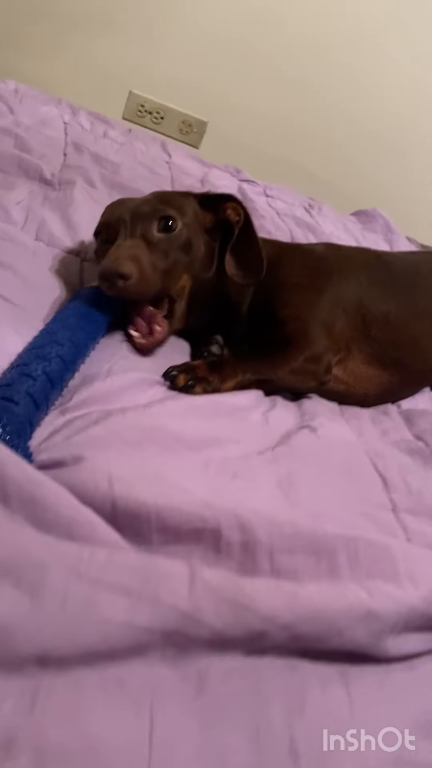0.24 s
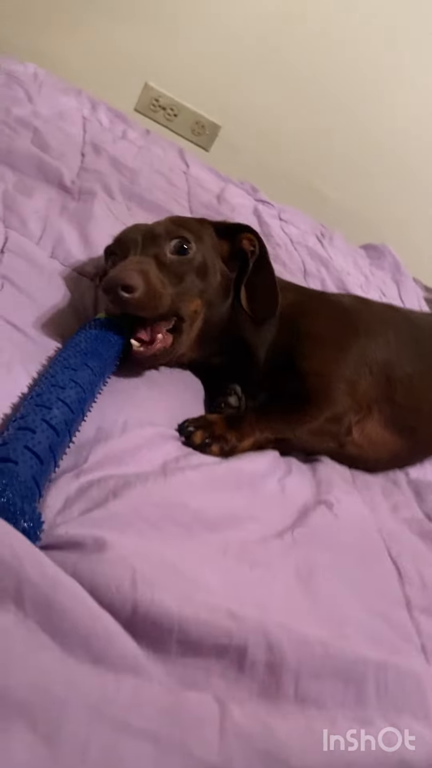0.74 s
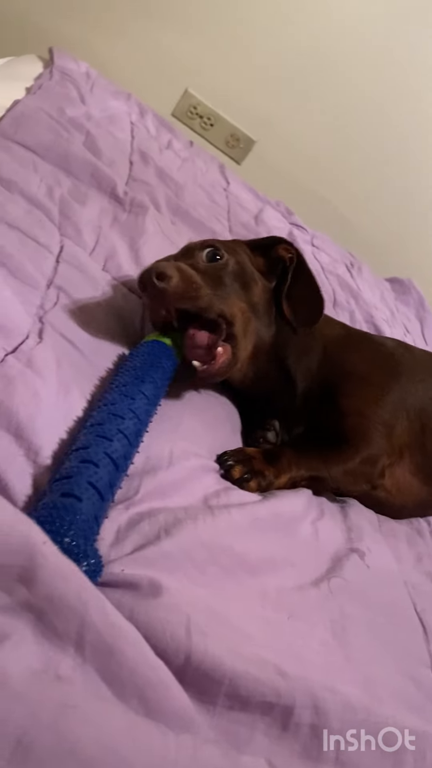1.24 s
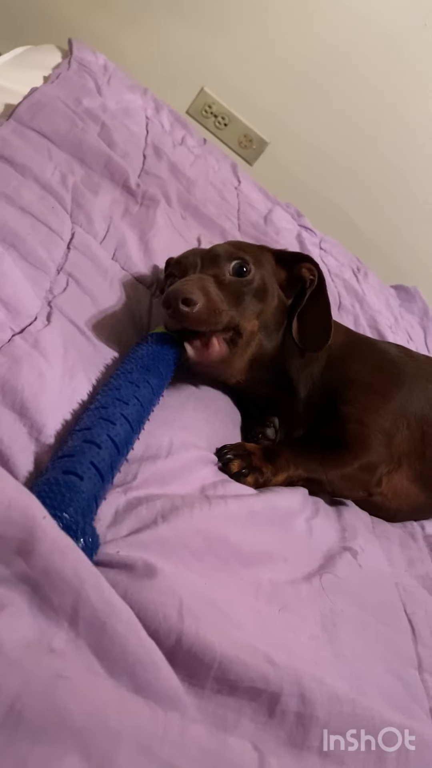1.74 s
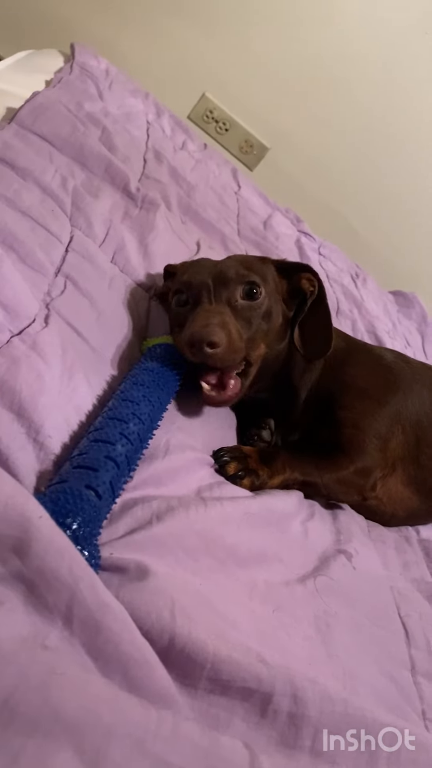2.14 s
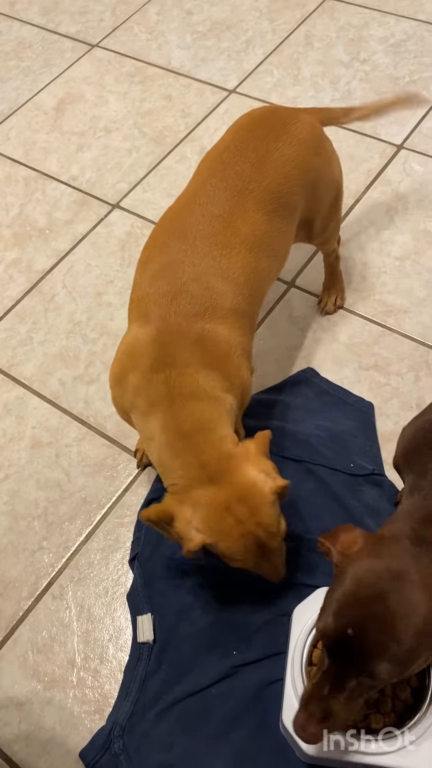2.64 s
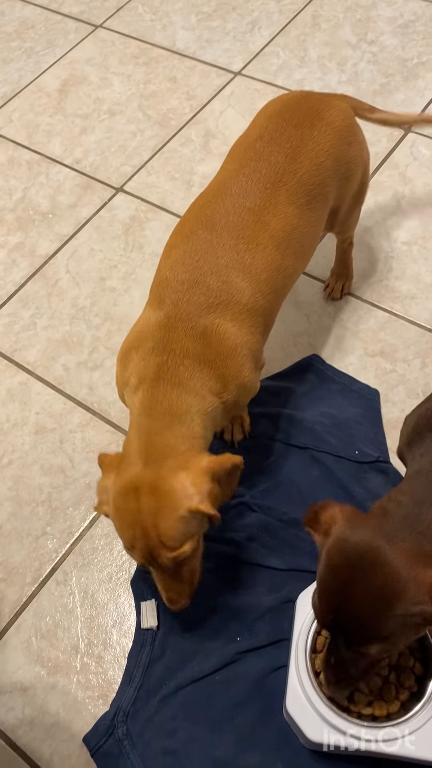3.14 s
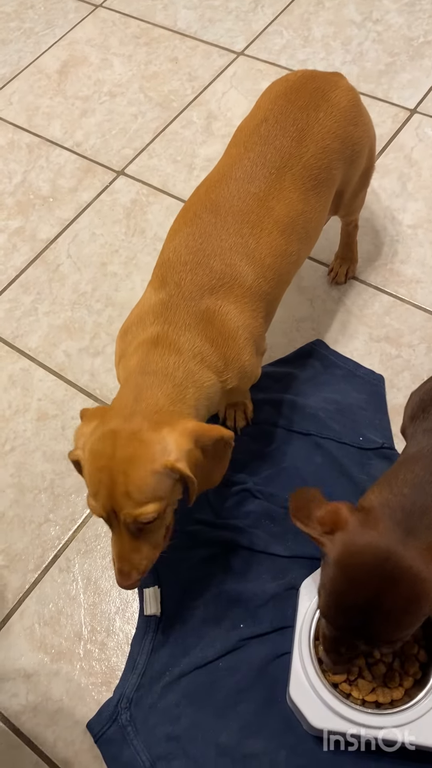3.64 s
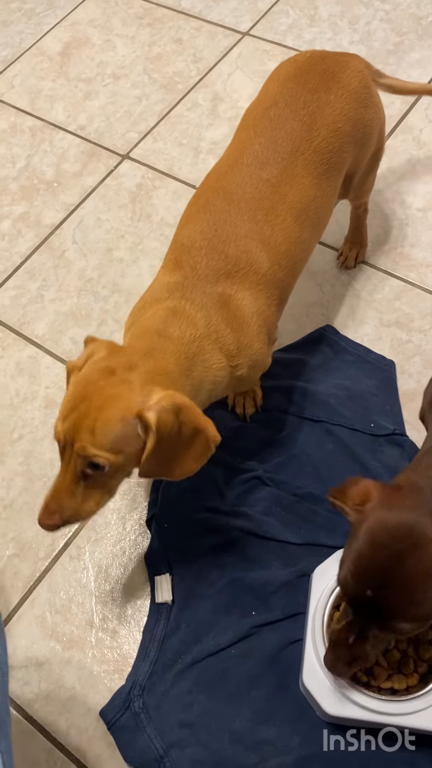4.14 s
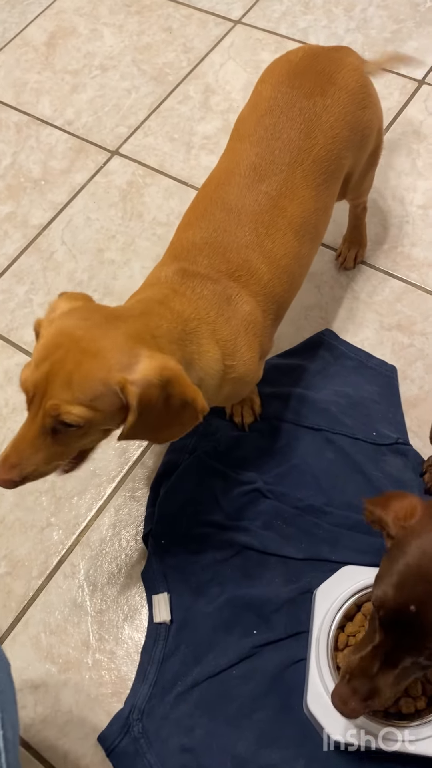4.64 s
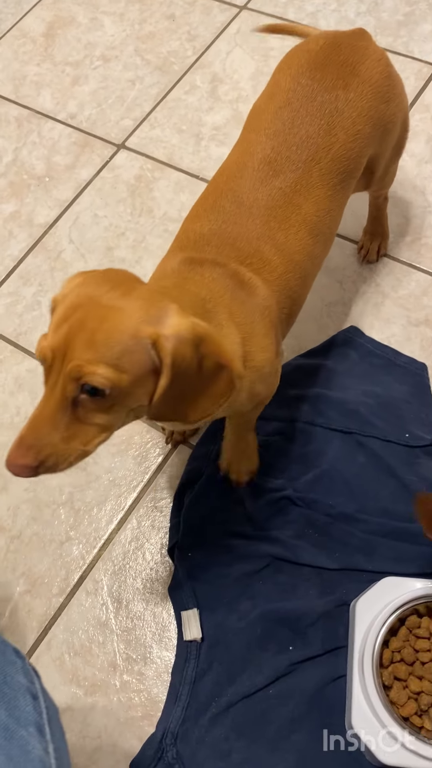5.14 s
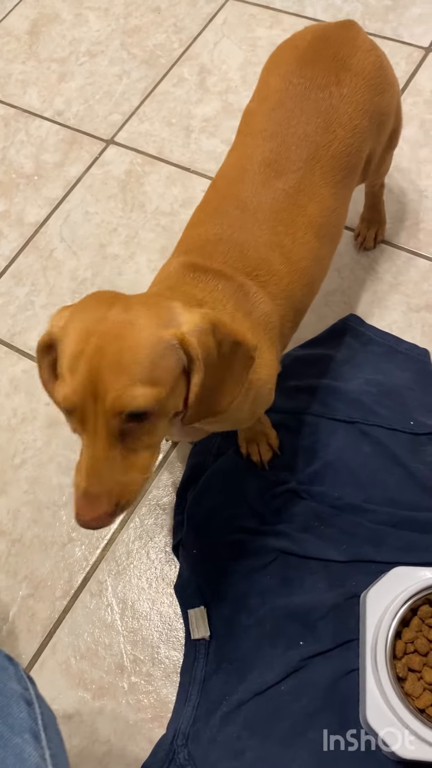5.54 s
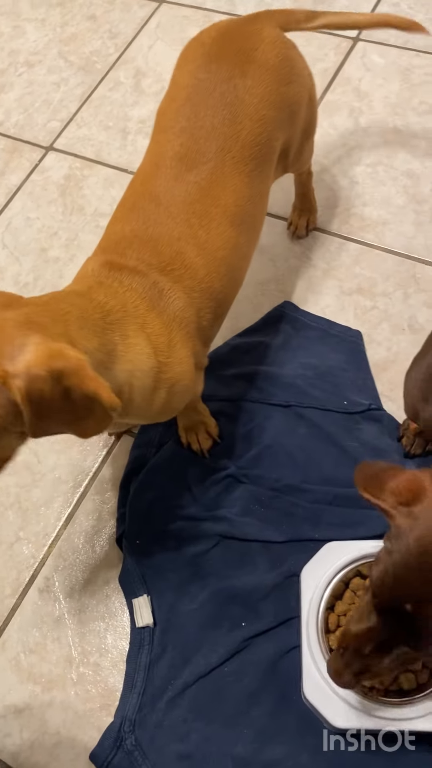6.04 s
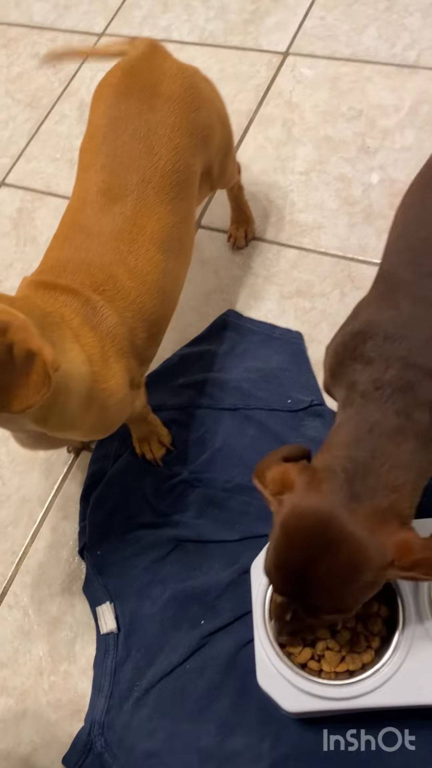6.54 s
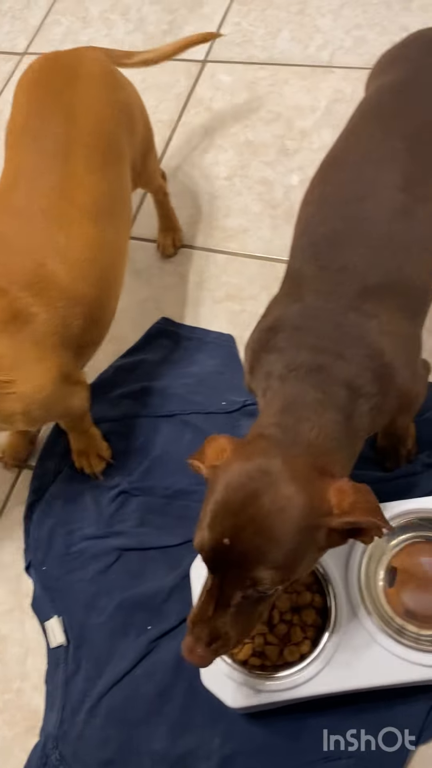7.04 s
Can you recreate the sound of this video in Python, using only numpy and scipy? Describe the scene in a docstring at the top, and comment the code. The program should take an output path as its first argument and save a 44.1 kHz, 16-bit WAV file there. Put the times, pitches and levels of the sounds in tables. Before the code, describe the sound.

Faint wet mouth clicks and one jaw clap, followed by dogs crunching kibble, with pellets rattling in metal bowls and hollow knocks.

```python
"""In a quiet bedroom a small dog smacks its lips and claps its jaws once: the click excites the resonances
of its mouth, and the mattress bounces. At 2.3 s the scene changes to a tiled kitchen, where two dogs nose
through dry pellets in steel bowls. Each bite is a brittle fracture that rings the steel; pellets collide,
and the hollow stand, pushed about, knocks and drums by stick-slip friction, loudest near 5 s. Both rooms
reverberate and rumble faintly. A phone with two microphone ports listens from above."""
import sys
import numpy as np
from scipy import signal
from scipy.fft import rfft, irfft, next_fast_len
from scipy.io import wavfile
from scipy.ndimage import uniform_filter1d

SR = 44100
rng = np.random.default_rng(int(sys.argv[2]) if len(sys.argv) > 2 else 0)


def wav_out(sig):
    """Save sig, one row per channel (or a flat mono array), as 16-bit PCM at SR to the path in sys.argv[1]."""
    wavfile.write(sys.argv[1], SR, np.round(np.clip(np.atleast_2d(sig).T, -1, 1) * 32767).astype(np.int16))


N = 321489
T = np.arange(N) / SR
KITCHEN = np.clip((T - 2.325) / 0.024, 0, 1)  # crossfade: 0 in the bedroom, 1 in the kitchen
HEAP_DB = -38.5  # reference level: a whole heap pushed aside

# muzzles stirring the bowls: (time [s], pellet rattle level [dB], stand drumming level [dB])
STIRRING = [(2.33, -56, -46), (2.44, -65, -70), (2.49, -56, -52.5), (2.62, -63, -64), (2.81, -49.5, -45),
            (2.92, -63, -62.5), (2.96, -53, -61.5), (3.05, -55.5, -53), (3.13, -60.5, -57),
            (3.3, -59.5, -60.5), (3.565, -66, -62.5), (3.66, -51.5, -47), (3.83, -47, -51),
            (3.93, -54, -55), (4.0, -47.5, -44.5), (4.19, -41, -43), (4.29, -36.5, -38.5),
            (4.37, -41, -40.5), (4.62, -41.5, -37), (4.79, -35, -32), (4.95, -39.5, -41),
            (5.3, -46.5, -41.5), (5.56, -36, -31.5), (5.9, -46.5, -40), (6.15, -49.5, -51),
            (6.25, -42, -45), (6.48, -51, -49), (6.56, -49, -50), (6.67, -54, -61), (6.92, -69.5, -61),
            (7.29, -51, -61)]
# modes of a steel bowl: (frequency [Hz], bandwidth [Hz], gain [dB])
BOWL_MODES = [(880, 210, -15.5), (1210, 100, -18.5), (1350, 68, -21), (3000, 90, -5.5), (3170, 450, -3),
              (5180, 1230, -5.5)]


def pellet_bites():
    """Brittle fracture: a pellet gives way between the teeth and excites the bowl's modes."""
    # pellets cracked or knocked: (time [s], level [dB], pitch [Hz], treble gain [dB])
    bites = [(2.35, -34, 1205, 6), (2.381, -29.5, 790, -7), (2.483, -33.5, 870, 10),
             (2.519, -32.5, 1195, 6.5), (2.685, -27.5, 804, -2), (2.696, -33.5, 850, 12),
             (2.749, -32.5, 810, -4), (2.784, -23.5, 1178, -4), (2.824, -29.5, 840, 7.5),
             (2.884, -40, 760, -5), (2.945, -27.5, 1280, -3), (2.961, -34.5, 2100, -4),
             (2.997, -38, 2020, -18), (3.012, -30, 1510, -2.5), (3.067, -34, 1100, -3),
             (3.103, -28.5, 737, -26), (3.179, -15.5, 1620, -27), (3.322, -35, 1780, -15),
             (3.343, -32.5, 1690, -17), (3.369, -40, 1560, -16), (3.397, -32.5, 1640, -20),
             (3.447, -32, 1540, 1), (3.483, -32.5, 1460, 3.5), (3.496, -33, 1420, -20),
             (3.586, -29.5, 1140, -38), (3.635, -24.5, 880, -11), (3.671, -29, 1260, 1),
             (3.693, -28.5, 1850, 2), (3.759, -27, 1480, 1.5), (3.85, -18.5, 1036, 9),
             (3.981, -19, 1960, -2.5), (4.019, -21.5, 785, 9), (4.088, -30, 1520, -10),
             (4.108, -15, 1550, -25), (4.146, -21, 930, -14), (4.27, -20.5, 750, -9),
             (4.296, -16, 1157, -18), (4.304, -18.5, 1160, -20), (4.352, -24, 1600, -4),
             (4.379, -36, 1090, -15), (4.415, -26.5, 1110, 7.5), (4.432, -22, 1150, -25),
             (4.47, -28.5, 860, 8.5), (4.521, -20.5, 1020, -3), (4.549, -23.5, 754, 7), (4.65, -19, 900, 7),
             (4.695, -22.5, 1360, 10.5), (4.74, -19.5, 930, -15), (4.771, -15, 1330, 3),
             (4.781, -17.5, 1420, 6), (4.815, -12.5, 1300, -2.5), (4.836, -5.5, 2850, -4.5),
             (4.888, -21.5, 1400, -13), (4.925, -33, 1120, -10), (4.968, -25.5, 890, -1),
             (4.996, -20.5, 750, -20), (5.017, -25.5, 1510, 2.5), (5.054, -21.5, 1560, -15),
             (5.077, -23, 850, -19), (5.103, -22.5, 1570, -26), (5.182, -28, 855, -18),
             (5.250, -23.5, 1066, -3), (5.333, -27, 875, -19), (5.359, -25, 910, 0.5),
             (5.413, -20.5, 1040, -3), (5.439, -27, 1120, 8), (5.532, -17, 926, -12),
             (5.645, -14, 2295, -6), (5.748, -28.5, 980, -22), (5.811, -28.5, 870, -1),
             (5.84, -24, 850, -0.5), (5.925, -28.5, 738, 8), (5.936, -20, 1760, 3), (5.978, -19.5, 760, -6),
             (6.037, -21, 1454, -4), (6.081, -32.5, 780, 7), (6.204, -40, 751, 17),
             (6.231, -31.5, 1070, 14), (6.278, -32.5, 690, 13), (6.309, -30.5, 1070, 10.5),
             (6.369, -22, 2020, -8), (6.495, -20, 1360, 1), (6.541, -24.5, 1226, 5), (6.686, -30, 1800, 3),
             (6.698, -24.5, 1880, -21), (6.704, -29, 1450, 7.5), (6.714, -31, 1950, -16),
             (6.774, -33.5, 834, -22), (6.864, -31.5, 710, -9), (7.036, -31, 1376, 7.5),
             (7.063, -31.5, 1360, -23), (7.074, -30, 1890, -23), (7.116, -32, 990, -20),
             (7.136, -23, 1950, -30), (7.146, -29, 2800, -22), (7.165, -15, 2850, -1)]
    return transients(bites, t60=0.018, rise_s=0.0012, softer_per_db=0.4553,
                      rough=0.91, crumbs_db=-31, wide_db=-8, steel_db=10.5)


def lip_smacks():
    """Impulsive excitation: the lips give short, bright clicks with a steep onset."""
    # (time [s], level [dB], pitch [Hz], treble gain [dB])
    smacks = [(0.423, -37, 3220, -8), (0.799, -43.5, 1320, 12.5), (.973, -37, 5550, -12),
              (1.272, -44.5, 1575, -22), (1.495, -47, 5100, -4), (1.535, -50, 4900, -9),
              (1.552, -51, 4800, -10), (2.021, -41.5, 1670, -16), (2.148, -46.5, 5270, -4)]
    return transients(smacks, t60=0.012, rise_s=0.0002, softer_per_db=0.5,
                      rough=0.33, crumbs_db=-29.5, wide_db=1, steel_db=-25.5)


def transients(events, t60, rise_s, softer_per_db, rough, crumbs_db, wide_db, steel_db):
    """Damped oscillation: a tone roughened by splinters, a broadband snap that rings steel, then crumbs."""
    out, t = np.zeros(N), np.arange(4000) / SR
    sag = 0.36 * (0.003 * (1 - np.exp(-t / 0.003)) - t / 2)  # pitch falls from 18 % sharp to 18 % flat
    for (s, db, hz, treble_db), noise in zip(events, rng.standard_normal((len(events), 3, 4000))):
        rise = rise_s * amp(softer_per_db * (-13 - db))  # slower below a hard bite of -13 dB
        envelope = (1 - np.exp(-(t / rise) ** 2)) * amp(-60 * t / t60)
        tone = envelope * np.sin(2 * np.pi * hz * (t + sag))
        flicker_db = 4.24 * unit_rms(uniform_filter1d(noise[2], 120))
        crumbs = amp(crumbs_db - 60 * t / (14 * t60) + flicker_db) * np.minimum(t / 0.0037, 1)
        splinters = resonate(noise[0], [(hz, 0.38 * hz, 0), (1.42 * hz, 0.5 * hz, -5)])
        splinters = (rough * envelope + crumbs) * unit_rms(highpass(splinters, 0.33 * hz))
        # heap and muzzle detune the bowl from bite to bite
        bowl = np.multiply(BOWL_MODES, [[1 + 0.07 * np.tanh(v), 1, 1] for v in noise[2, :len(BOWL_MODES)]])
        snap_envelope = envelope * attack(t, 0.00061) * amp(5 - 60 * 0.62 * t / t60)  # dies 62 % faster
        burst = (snap_envelope + crumbs) * noise[1]
        snap = amp(wide_db) * highpass(burst, 1700) + amp(steel_db) * resonate(burst, bowl)
        add(out, s, amp(db) * (tone + splinters + amp(treble_db) * snap))
    return colour(out, [(300, 8), (800, 3), (5500, -6.5), (8000, -7), (16000, -22)])


def jaw_clap():
    """Cavity resonance: a falling click rings the mouth, then the mattress bounces; both reverberate."""
    # (frequency [Hz], bandwidth [Hz], gain [dB])
    mouth_modes = [(1440, 360, -0.5), (2415, 140, -5), (3310, 300, -4.5), (4430, 420, -6.5),
                   (9500, 4700, -8.5)]
    clap_s, bounce_hz = 0.8611, 94.6
    click, bounce, t = np.zeros(N), np.zeros(N), np.arange(14000) / SR
    sweep = np.sin(2 * np.pi * np.cumsum(350 + 6500 * np.exp(-t / 0.002)) / SR)
    add(click, clap_s, amp(-17 - 60 * t / 0.016) * attack(t, 0.00025) * sweep)
    add(click, clap_s, amp(-25.5 - 60 * t / 0.027) * highpass(rng.standard_normal(len(t)), 2000))
    mouth = 0.08 * click + amp(2.6) * resonate(click, mouth_modes)
    swing = np.sin(2 * np.pi * np.cumsum(bounce_hz + 420 * np.exp(-t / 0.0029)) / SR)
    add(bounce, clap_s + 0.0073, amp(-21 - 60 * t / 0.16) * attack(t, 0.0037) * swing)
    return room(bounce, wet_db=-11, size=0.7) + room(mouth, wet_db=-11, size=1.25)


def stand_knocks():
    """Free vibration: the hollow stand knocks on the tiles and rings down, its pitch sagging a little."""
    # (time [s], level [dB], pitch [Hz])
    knocks = [(2.483, -34, 377), (2.574, -33, 87), (2.69, -36, 110), (3.566, -33.5, 108), (4.022, -29, 147),
              (4.118, -26, 158), (4.156, -26.5, 292), (4.402, -25, 358), (4.468, -22, 153),
              (4.774, -17.5, 358), (4.887, -22.5, 435), (5.018, -23, 287), (5.105, -19, 412),
              (5.117, -25.5, 188), (5.256, -25.5, 295), (5.368, -28, 313), (5.509, -21, 326),
              (5.548, -23, 406), (5.68, -28, 402), (5.721, -24.5, 336), (5.839, -22, 411),
              (5.941, -28, 375), (6.076, -30, 350)]
    out, t = np.zeros(N), np.arange(9000) / SR
    for s, db, hz in knocks:
        t60 = 0.061 * (340 / hz) ** 0.18  # lower knocks swing longer
        cycles = hz * (t + 0.0007 * (1 - np.exp(-t / 0.013)))
        add(out, s, amp(db - 60 * t / t60) * attack(t, 0.00037) * np.sin(2 * np.pi * cycles))
    return out


def pellet_rattle():
    """Random collisions: pellets tumble in two bowls, in clumps of tiny knocks that ring the steel."""
    # (frequency [Hz], gain [dB])
    spectrum = [(300, 6.5), (500, -39), (650, -2.5), (950, 0), (2500, -5.5), (3700, -13.5), (5000, -16.5),
                (7300, -19), (11000, -26), (16000, -25)]
    knocks, t = np.zeros((2, N)), np.arange(500) / SR
    clumps = amp(2.7 * unit_rms(uniform_filter1d(uniform_filter1d(rng.standard_normal(N), 400), 400)))
    for k, hz in enumerate(np.geomspace(550, 14000, num=20)):
        knock = attack(t, 0.00023) * np.exp(-t * hz / 2.55) * np.sin(2 * np.pi * hz * t)
        impacts = impulses(per_s=170 * (hz / 550) ** 0.6, spread_db=0.86)
        knocks[k % 2] += unit_rms(signal.oaconvolve(impacts, knock)[:N]) * np.sqrt(hz)
    knocks = unit_rms(knocks + 0.84 * knocks[::-1]) * clumps  # each bowl reaches both channels
    body = unit_rms(colour(knocks + resonate(knocks, BOWL_MODES), spectrum))
    treble = highpass(body, 3100)
    level_db = curve(STIRRING, column=1)
    treble_gain = amp(0.0555 * (level_db - HEAP_DB))  # gentle stirring is slightly duller
    return amp(level_db) * (body - treble + treble * treble_gain) * KITCHEN


def stand_skid():
    """Stick-slip friction: the plastic stand skids unevenly, and each slip drums its hollow body."""
    # (frequency [Hz], bandwidth [Hz], gain [dB])
    stand_modes = [(149, 15.3, -3), (258.5, 59, -5.5), (305, 8.1, -6.5), (353.6, 63, 0), (418, 29, -5)]
    slips = impulses(per_s=600, spread_db=2) + 0.14 * rng.standard_normal(N)
    drumming = unit_rms(resonate(uniform_filter1d(slips, 25), stand_modes))
    return amp(curve(STIRRING, column=2)) * drumming * KITCHEN


def ticks_and_sniffs():
    """Exponential decay of high noise: short bursts tick, longer ones swell first, as sniffs."""
    # (time [s], level [dB], T60 [s])
    bursts = [(2.424, -47, 0.011), (2.465, -41, 0.0073), (2.484, -43, 0.047), (2.921, -39, 0.0051),
              (3.031, -44, 0.087), (3.424, -44, 0.13), (3.694, -45, 0.025), (4.693, -51, .012),
              (5.82, -43, 0.013), (6.302, -43, 0.012), (6.787, -46, 0.02), (6.889, -36, 0.0082),
              (7.209, -40.5, 0.097)]
    out, t = np.zeros(N), np.arange(5000) / SR
    for (s, db, t60), noise in zip(bursts, rng.standard_normal((len(bursts), 5000))):
        add(out, s, amp(db - 60 * t / t60) * attack(t, t60 ** 2) * highpass(noise, 4500))
    return out


def room(x, wet_db, size):
    """Reverberation: sparse reflections of random sign, each band dying at its own rate."""
    # (frequency [Hz], T60 at size 1 [s])
    decay_times = [(100, 0.92), (500, 0.22), (2000, 0.41), (5000, 0.4), (12000, 0.14)]
    taps = np.zeros((2, SR // 2))
    slots = np.arange(200, SR // 2 - 20, 20)
    delays = slots + rng.integers(0, 20, (2, len(slots)))
    np.put_along_axis(taps, delays, rng.choice([-1., 1.], delays.shape), 1)
    hz, t, bands = signal.stft(taps, SR, nperseg=256)
    t60 = size * at_hz(decay_times, hz)[:, None]
    tail = signal.istft(bands * amp(-60 * t / t60), SR, nperseg=256)[1]
    tail /= np.linalg.norm(tail[0])
    return x + amp(wet_db) * signal.fftconvolve(x * np.ones((2, 1)), tail, axes=1)[:, :N]


def hush():
    """Ambient noise: the bedroom's treble wavers; the kitchen's rumble follows the stand's drumming."""
    # noise spectra: (frequency [Hz], density [dB])
    bedroom_spectrum = [(15, -45), (25, -17.5), (40, -5.5), (70, 4.5), (150, -8.5), (200, -11.5),
                        (400, -24.5), (600, -31.5), (1400, -35), (3400, -39), (7000, -44), (16000, -52)]
    kitchen_spectrum = [(15, -39), (25, -21), (60, 7), (130, 0), (250, -10), (600, -29.5), (1300, -35.5),
                        (5000, -33), (16000, -42)]
    # bedroom hush: (time [s], level [dB], treble gain [dB])
    bedroom_levels = [(0, -48, -5), (.3, -48, -2), (.5, -50, 5), (.68, -52, 2.5), (.85, -48, 1.5),
                      (1.2, -49, -4.5), (1.5, -51.5, -4), (1.6, -53.5, -13.5), (2.0, -51.5, -10),
                      (2.32, -51, -9.5)]
    crossfeed = np.array([[0.82, 0.034], [0.067, 1.0]])  # two nearly independent channels
    bedroom, kitchen = (unit_rms(colour(crossfeed @ rng.standard_normal((2, N)), spectrum))
                        for spectrum in (bedroom_spectrum, kitchen_spectrum))
    air = highpass(bedroom, 860) * amp(1.6 * unit_rms(uniform_filter1d(rng.standard_normal(N), 1500)))
    bedroom = bedroom - air + air * amp(curve(bedroom_levels, column=2))
    bedroom *= amp(curve(bedroom_levels, column=1))
    kitchen *= amp(-45.5 + 0.23 * (curve(STIRRING, column=2) - HEAP_DB))
    return bedroom * (1 - KITCHEN) + kitchen * KITCHEN


def amp(db):
    """Amplitude ratio of a level in decibels."""
    return 10 ** (np.asarray(db) / 20)


def attack(t, tau_s):
    """First-order rise from 0 to 1."""
    return 1 - np.exp(-t / tau_s)


def unit_rms(x):
    """Normalisation to unit power."""
    return x / np.sqrt(np.mean(x ** 2) + 1e-20)


def at_hz(points, hz):
    """Interpolation on a log-frequency axis."""
    f, value = np.transpose(points)
    return np.interp(np.log(hz + 1), np.log(f + 1), value)


def curve(rows, column):
    """Linear interpolation in time, at every sample."""
    rows = np.array(rows)
    return np.interp(T, rows[:, 0], rows[:, column])


def colour(x, points):
    """Minimum-phase filter through (frequency [Hz], gain [dB]) points."""
    log_gain = np.log(amp(at_hz(points, abs(np.fft.fftfreq(4096, 1 / SR)))))
    taps = np.fft.ifft(np.exp(np.conj(signal.hilbert(log_gain)))).real[:2048]
    return signal.oaconvolve(x, taps.reshape((1,) * (x.ndim - 1) + (-1,)), axes=-1)[..., :N]


def resonate(x, modes):
    """Modal synthesis: a sum of damped resonators driven by x."""
    poles = [(np.exp((2j * hz - width) * np.pi / SR), db) for hz, width, db in modes]
    return sum(amp(db) * (1 - abs(p)) * 2 * signal.lfilter([1], [1, -p], x).real for p, db in poles)


def highpass(x, hz):
    """Second-order high-pass filter."""
    return signal.sosfilt(signal.butter(2, hz, "high", fs=SR, output="sos"), x)


def add(mix, s, sound):
    """Superposition of a sound starting at s seconds."""
    part = mix[round(s * SR):][:len(sound)]
    part += sound[:len(part)]


def impulses(per_s, spread_db):
    """Random point process: sparse clicks of either sign, a few of them large."""
    size = amp(spread_db * np.minimum(rng.exponential(1, N), 4)) * rng.standard_normal(N)
    return size * (rng.random(N) < per_s / SR)


def scene():
    """Superposition: the near sources, each with its reverberation, over the hush."""
    bedroom = room(lip_smacks(), wet_db=-10.5, size=0.7) + jaw_clap()
    bites = pellet_bites() + ticks_and_sniffs()
    kitchen = room(stand_knocks() + stand_skid(), wet_db=-12.5, size=0.13)
    kitchen += room(bites, wet_db=-7.5, size=0.44)
    kitchen += room(pellet_rattle(), wet_db=-5.5, size=0.82)
    return bedroom + kitchen + hush()


def record(dry):
    """Diffraction: the phone's case shifts phase and level between the ports; a low-pass ends the band."""
    # (frequency [Hz], phase lead of the left port [rad])
    port_phase = [(0, 0), (1720, 0.0), (2840, 2.0), (3270, 2.0), (3880, 0.5), (5000, 0.1), (6980, 3.0),
                  (8180, 3.5), (9730, 6.2), (11000, 6.3), (12500, 9.0), (14400, 9.6), (15600, 12.3),
                  (16500, 12.8)]
    # (frequency [Hz], level of left over right [dB])
    port_tilt = [(300, -0.6), (700, 3), (1290, 1), (2380, -2.5), (4400, 0), (8120, -1), (15000, 0.5)]
    # (frequency [Hz], gain of the part the ports do not share [dB])
    port_difference = [(30, -25), (120, -20), (330, -5), (770, 4.5), (1500, -4), (3000, -2.5), (5000, 1.5),
                       (7000, -10), (16000, -2.5)]
    size = next_fast_len(N + 4096)
    hz = np.fft.rfftfreq(size, 1 / SR)
    left, right = rfft(dry, size)
    right = left + amp(at_hz(port_difference, hz)) * (right - left)
    lag = np.exp(-1j * np.interp(hz, *np.transpose(port_phase)))
    tilt = amp(at_hz(port_tilt, hz) / 2)
    ports = irfft([left * tilt, right * lag / tilt], size)[:, :N]
    lowpass = signal.firwin(511, cutoff=16300, window=("kaiser", 9), fs=SR)
    return signal.oaconvolve(ports, lowpass[None], "same")


dry = scene()
out = record(dry)
wav_out(out)
```